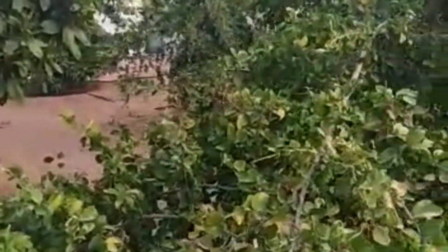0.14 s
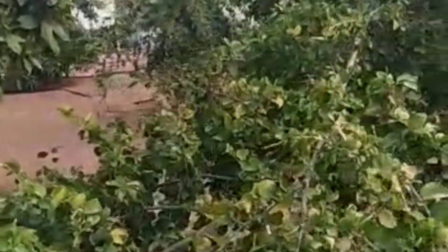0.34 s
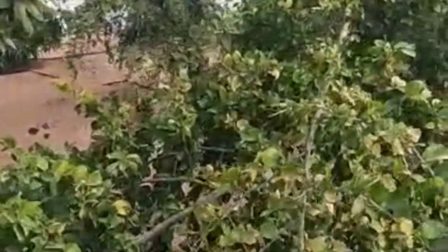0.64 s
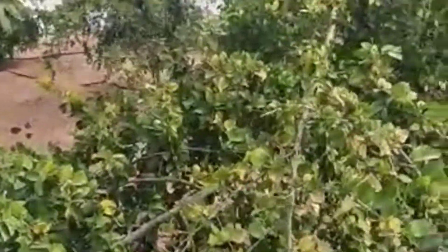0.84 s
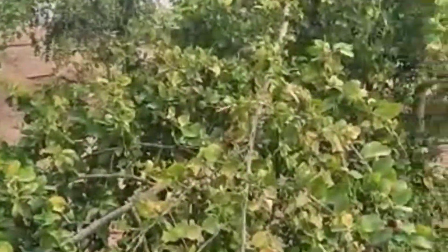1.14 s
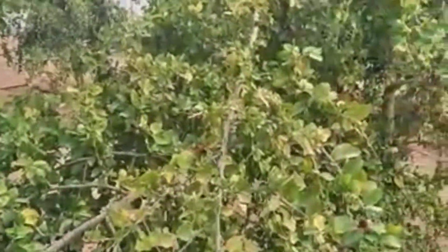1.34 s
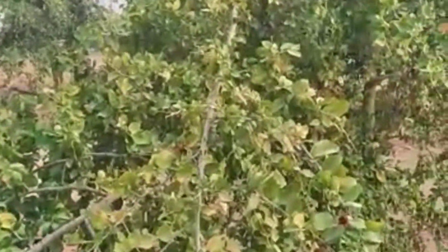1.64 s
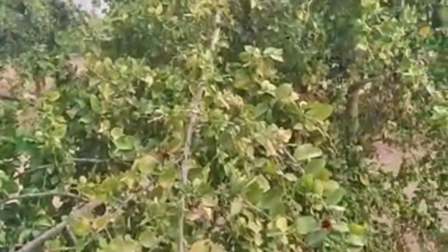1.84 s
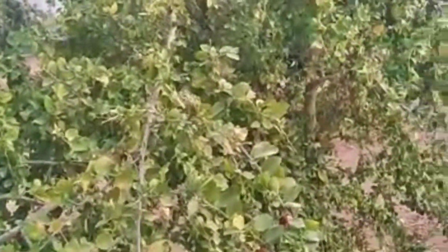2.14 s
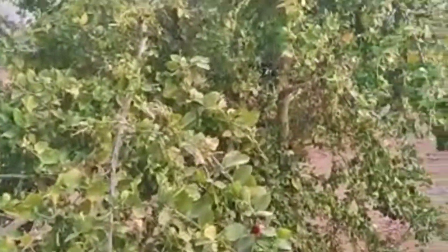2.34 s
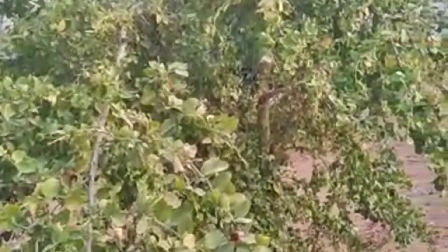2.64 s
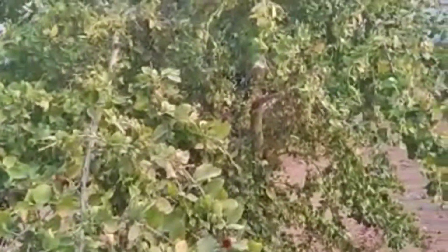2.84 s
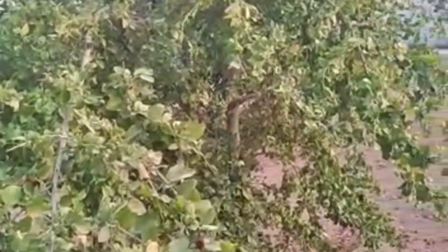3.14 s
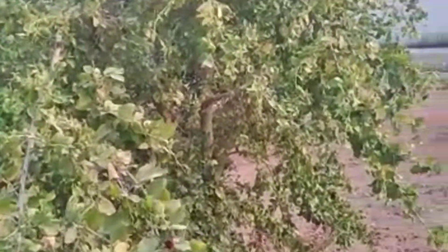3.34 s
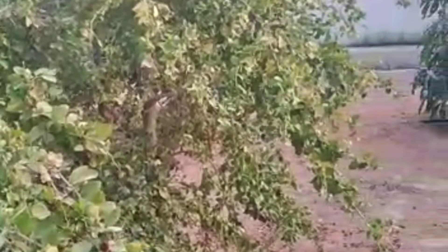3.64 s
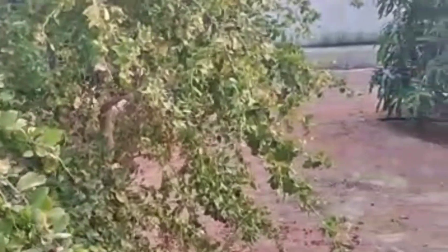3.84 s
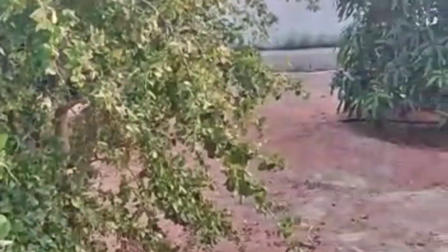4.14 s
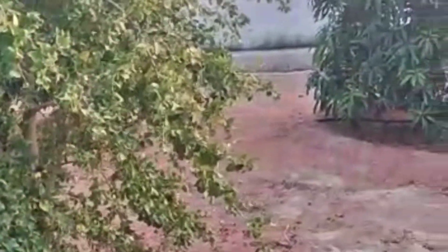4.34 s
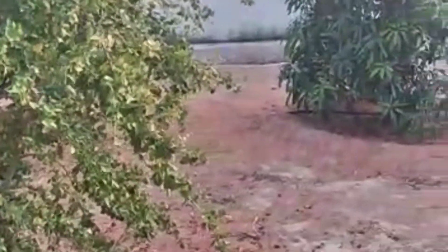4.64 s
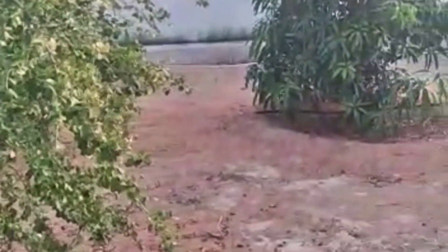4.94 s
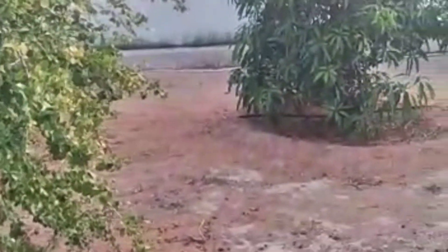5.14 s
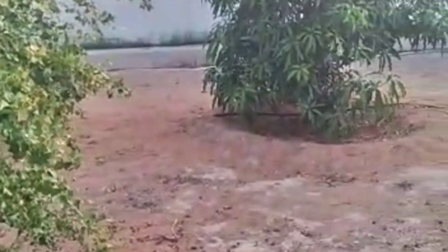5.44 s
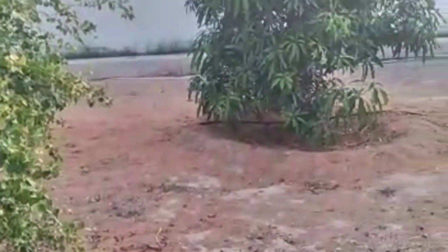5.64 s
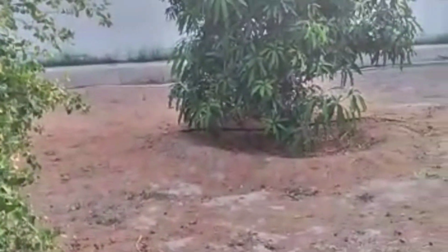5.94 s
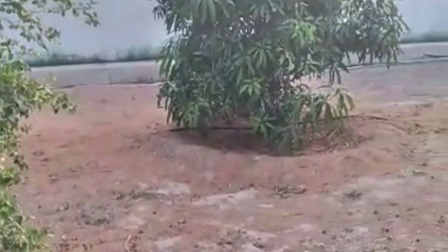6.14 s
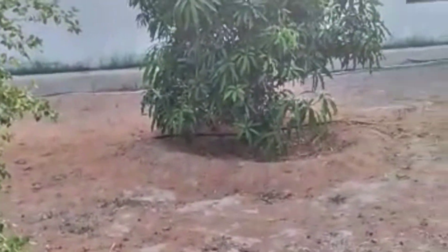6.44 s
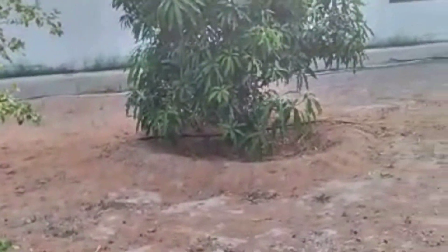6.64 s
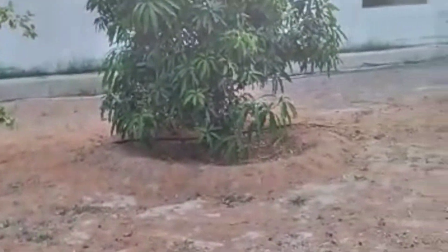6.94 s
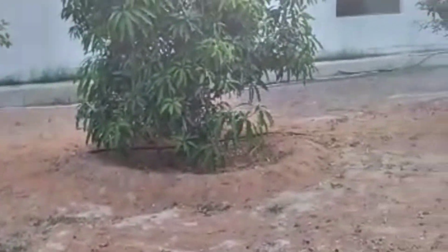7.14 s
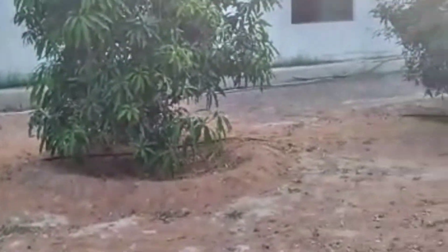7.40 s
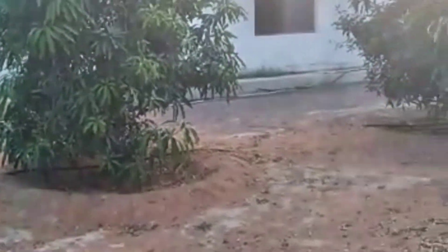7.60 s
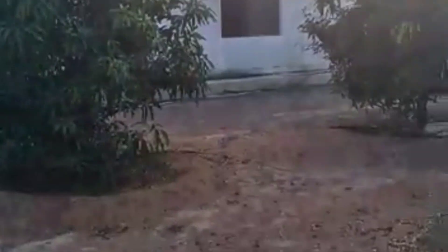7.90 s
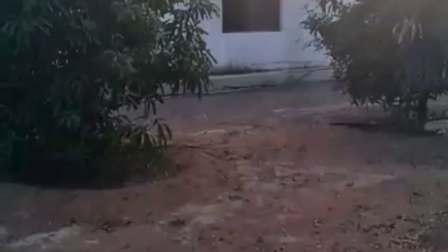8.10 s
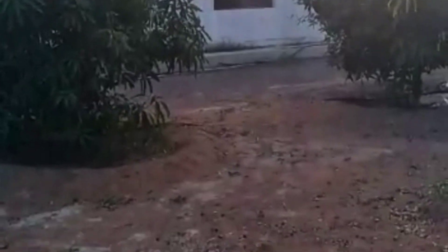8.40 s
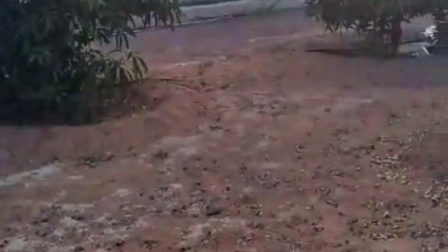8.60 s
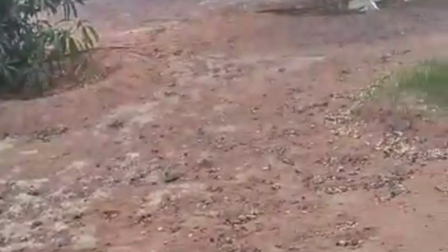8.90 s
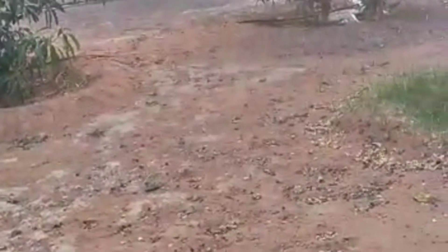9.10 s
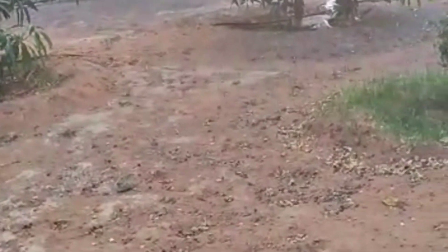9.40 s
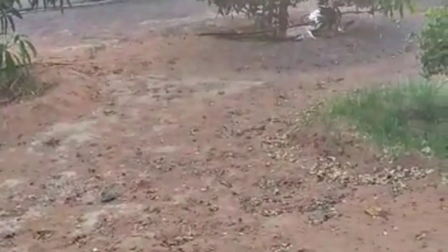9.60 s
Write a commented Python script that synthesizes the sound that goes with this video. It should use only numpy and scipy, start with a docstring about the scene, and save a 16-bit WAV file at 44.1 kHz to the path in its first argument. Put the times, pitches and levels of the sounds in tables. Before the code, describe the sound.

Outdoor stereo ambience among trees and walls: a nearby house sparrow chirps steadily, some calls clear and warbling, others rattling and softer. Distant sparrows fill the gaps with weak, echoing replies. Soft road rumble, an unsteady low hum and faint far whines continue throughout. After eight seconds, a few tiny handling-like clicks and a sharp ringing knock occur close to the microphone's left side.

```python
"""Sparrows in a walled yard

A sparrow chirps again and again close by; others answer from farther off, blurred by echo.
Each chirp is a gliding sine with a rough rasp at its start; the close bird adds overtones and fizz.
Shaped noise makes distant traffic and tree hiss, wandering sines a motor's hum and far whines.
Thin far whistles and brief leaf rustles pass; late on come small noise ticks and a ringing knock."""
import sys
import numpy as np
from scipy import signal
from scipy.fft import rfft, irfft, next_fast_len
from scipy.io import wavfile
from scipy.ndimage import uniform_filter1d

SR = 44100
rng = np.random.default_rng(int(sys.argv[2]) if len(sys.argv) > 2 else 0)


def master(y):
    """Save y as 16-bit WAV."""
    cut = np.clip(np.atleast_2d(y).T, -1, 1)
    pcm = np.round(cut * 32767)  # scale
    wavfile.write(sys.argv[1], SR, pcm.astype(np.int16))


N = 430406
TIME = np.arange(N) / SR
RASP_LEAD_S = 0.031  # the rasp starts this long before the chirp's whistle


def from_db(db):
    """Decibels to gain."""
    return 10 ** (np.asarray(db) / 20)


def rms_one(x):
    """Scale to unit rms."""
    return x / np.sqrt(np.mean(x ** 2) + 1e-20)


def at_hz(points, hz):
    """Read a curve of (Hz, value) points on a log-frequency axis."""
    point_hz, values = np.transpose(points)
    return np.interp(np.log(hz + 1e-3), np.log(point_hz), values)


def pan(db):
    """Left and right gains for a left-over-right level difference, at constant power."""
    gains = from_db(np.array([[db], [-db]]) / 2)
    return gains / np.sqrt(np.mean(gains ** 2))


def from_left(x, lag_ms):
    """A sound from the left reaches the right microphone a little later."""
    return np.array([x, np.interp(TIME - lag_ms / 1000, TIME, x)])


def drift(rate, size=N):
    """Random wander about zero: straight lines between normal draws, `rate` draws a second."""
    steps = np.arange(size) * rate / SR
    count = int(steps[-1]) + 2
    return np.interp(steps, np.arange(count), rng.standard_normal(count))


def add(track, s, sound):
    """Mix a sound into a track at a time in seconds."""
    start = round(s * SR)
    part = track[..., start:start + sound.shape[-1]]
    part += sound[..., :part.shape[-1]]


def noise(spectrum):
    """Stereo noise of rms 1, alike in the bass and diffuse in the treble."""
    # Likeness between the ears. Each row: frequency in Hz, coherence from 0 to 1.
    likeness = [(250, 0.97), (500, 0.81), (1000, 0.49), (8000, 0.08)]
    size = next_fast_len(N, True)
    hz = np.fft.rfftfreq(size, 1 / SR)
    mid, side = rfft(rng.standard_normal((2, size)))
    alike = np.clip(at_hz(likeness, hz), 0, 1)
    lowest_hz, highest_hz = spectrum[0][0], spectrum[-1][0]
    gain = from_db(at_hz(spectrum, hz))
    # roll off well outside the drawn spectrum
    gain = gain / (1 + (hz / (2 * highest_hz)) ** 4) / (1 + (lowest_hz / (2 * hz + 1)) ** 4)
    ears = np.sqrt(1 + alike) * mid + np.sqrt(1 - alike) * side * [[1], [-1]]
    return rms_one(irfft(gain * ears)[:, :N])


def uneven(x, patchy_db):
    """The treble flickers in narrow patches, about a tenth of a second long."""
    hz, _, cells = signal.stft(x, SR, nperseg=1024)
    patches = rng.standard_normal(cells.shape[1:])
    patches = uniform_filter1d(uniform_filter1d(patches, size=7, axis=0), size=10, axis=1)
    depth_db = patchy_db * np.clip(hz[:, None] / 2200, 0, 1) ** 4  # full depth above 2200 Hz
    gain = from_db(depth_db * np.clip(rms_one(patches), -2.5, 1.5))
    gain = gain / np.sqrt(np.mean(gain ** 2, axis=1, keepdims=True))
    return signal.istft(cells * gain, SR, nperseg=1024)[1][:, :N]


def yard(x, wet_db, early_db, early_s, t60=0.7):
    """Quick scatter off nearby walls and leaves, then the yard's longer tail (t60 in s)."""
    t = TIME[:SR]
    sparse = rng.standard_normal((2, SR)) * (rng.random((2, SR)) < .05)
    scatter = sparse * np.exp(-t / early_s) * (t > .001)
    tail = rng.standard_normal((2, SR)) * from_db(-60 * t / t60) * (1 - np.exp(-t / 0.013))
    # at 0 dB, scatter or tail carries as much energy as the direct sound
    response = (from_db(early_db) * rms_one(scatter) + from_db(wet_db) * rms_one(tail)) / np.sqrt(SR)
    return x + signal.fftconvolve(x * np.ones((2, 1)), response, axes=1)[:, :N]


def background(hum_wander=0.00437, swell_db=2.0, air_db=-69.5):
    """Far traffic, a slightly unsteady motor and the faint hiss of the trees."""
    # Traffic over time. Each row: time in seconds, rumble in dB, tyre noise in dB.
    traffic = [(0.0, -46, -55.5), (1.249, -44, -55.5), (5.98, -45, -56), (6.79, -44.5, -58.5),
               (7.4, -45, -55), (9.16, -44.5, -60.5), (9.76, -44.5, -54)]
    # The motor's hum. Each row: mean pitch in Hz, mean level in dB rms.
    hum_tones = [(61, -51), (87.3, -56.5), (101, -59), (122, -54.5), (244, -54)]
    # Noise colours. Each row: frequency in Hz, relative density in dB per Hz.
    rumble_colour = [(25, -22), (45, -21.5), (75, -2), (120, 1), (190, -1), (300, -1), (420, -11),
                     (700, -22)]
    tyre_colour = [(250, -40), (450, 0.5), (740, 4), (950, -11), (1200, -5), (1500, -3.5), (1850, -19.5),
                   (2300, -16.5), (4000, -30.5)]
    swish_colour = [(700, -25), (1350, 6.5), (2000, -13.5)]
    air_colour = [(1500, -30), (2600, -10.5), (4000, -7), (5800, -21), (13500, -31)]

    s, rumble_db, tyres_db = np.transpose(traffic)
    road = from_db(np.interp(TIME, s, rumble_db)) * noise(rumble_colour)
    road += from_db(np.interp(TIME, s, tyres_db) + swell_db * drift(16)) * noise(tyre_colour)
    # one far swell of tyre noise
    swell = np.exp(-np.minimum(((TIME - 2.3) / 0.33) ** 2, 50))
    road += from_db(-59.0) * swell * noise(swish_colour)
    hum = np.zeros(N)
    for hz, db in hum_tones:
        phase = 2 * np.pi * np.cumsum(hz * (1 + hum_wander * drift(8))) / SR
        hum += from_db(db + .8 * drift(5)) * np.sqrt(2) * np.sin(phase)
    air = from_db(air_db) * noise(air_colour)
    # the swapped ears put the hum on the right
    return uneven(road + air, patchy_db=10.5) + from_left(hum, lag_ms=0.19)[::-1]


def chirp(name, flutter_db, flutter_rate, jitter=0.0067, edge_s=0.00055):
    """One gesture of the syrinx, a rounded glide that may shake into a trill: (phase, envelope)."""
    # The repertoire by kind of chirp. Each row: time in seconds, pitch in Hz before the bird's
    # own pitch ratio, level in dB relative to the call.
    repertoire = { "warble": [(0, 3450, -23.5), (.007, 4200, -3), (.015, 5200, -4.5), (.029, 5350, 1),
                  (.034, 4250, -1), (.049, 3950, -5.5), (.056, 3200, -12.5), (.064, 4700, -0.5),
                  (.070, 3450, -3), (.077, 3250, -14), (.089, 4100, -0.5), (.105, 4680, -1.5),
                  (.111, 3600, -3.5), (.124, 2550, -16.5), (.133, 3550, -8.5), (.145, 2500, -17)],
                  "chirrup": [(0, 3700, -8.5), (.009, 4800, -0.5), (.036, 5250, 4), (.043, 3750, 0),
                  (.054, 3250, -20), (.066, 2900, -24), (.075, 3450, -5.5), (.092, 3200, -4),
                  (.114, 4080, 0), (.118, 3200, -3), (.130, 2700, -31)], "cheep": [(0, 3860, -10),
                  (.010, 4780, -7.5), (.026, 4796, 6), (.039, 3510, -4), (.047, 4010, -4.5),
                  (.056, 2950, -14), (.068, 3600, 1), (.083, 4150, 2), (.089, 3340, -0.5),
                  (.112, 2600, -14)], "trill": [(0, 5710, 1), (.005, 3880, -12.5), (.016, 5325, -2),
                  (.034, 5190, -4.5), (.038, 4420, 5), (.045, 4930, -10.5), (.092, 4700, 3.5),
                  (.097, 3400, -11), (.117, 4330, 5), (.125, 3980, -13.5), (.137, 4000, -4)],
                  "slur": [(0, 3650, -14), (.015, 5300, 5.5), (.029, 4200, -5.5), (.039, 4300, 10.5),
                  (.044, 3250, -2), (.062, 4550, 0), (.072, 3850, 4), (.138, 2600, -8.5)],
                  "answer": [(0, 5400, -4), (.008, 5900, -2), (.030, 4700, 3.5), (.042, 3200, -2.5),
                  (.058, 3495, -14), (.100, 3900, 3), (.118, 2800, -3)], "arches": [(0, 3720, -9),
                  (.021, 5380, 4.5), (.040, 4125, 1.5), (.062, 3300, -18), (.086, 3500, -3.5),
                  (.114, 4580, 7.5), (.128, 3330, -20)], "drop": [(0, 3850, -8.5), (.040, 2940, -15),
                  (.085, 2680, -25)], }
    # Stretches of rapid pitch shake by kind of chirp: start in seconds, end in seconds,
    # depth in Hz, rate in Hz; the depth also follows the bird's ratio.
    shakes = {"trill": (0.036, 0.095, 650, 170), "slur": (0.069, 0.14, 310, 100)}
    s, hz, db = np.transpose(repertoire[name])
    t = TIME[:SR // 5]
    start, end, depth_hz, rate_hz = shakes.get(name, (0, 0, 0, 0))
    pitch = uniform_filter1d(np.interp(t, s, hz), size=150)
    shake_phase = 2 * np.pi * rate_hz * (t - start) + drift(rate_hz, size=len(t)) / 2
    pitch += depth_hz * ((t > start) & (t < end)) * np.sin(shake_phase)
    # no two calls are alike: the pitch trembles a little
    pitch *= 1 + jitter * drift(401, size=len(t))
    level_db = np.interp(t, s, db) + flutter_db * drift(flutter_rate, size=len(t))
    edges = np.clip(np.minimum(t, s[-1] - t) / edge_s, 0, 1)
    return 2 * np.pi * np.cumsum(pitch) / SR, np.sqrt(2) * from_db(level_db) * edges


def opening_rasp(hz, rise_hz=1500, roughness_rate=1700, length_s=.052):
    """Each chirp starts with a rasp: a broad, rough high note that swells and lifts."""
    count = int(length_s * SR)
    phase = 2 * np.pi * np.cumsum(hz + rise_hz * np.linspace(-.5, .5, count)) / SR
    rough = drift(roughness_rate, size=count) * np.sin(phase)
    rough += drift(roughness_rate, size=count) * np.cos(phase)
    return np.hanning(count) * rough


def near_sparrow(fizz_db=-34, second_db=-24, third_db=-38, wet_db=-12):
    """A clear whistle; its hoarse overtones and fizz come strongly scattered off the walls."""
    # The close bird's calls. Each row: start in seconds, level in dB, opening rasp in dB relative
    # to the call, rasp pitch in Hz, pitch ratio of the whistle, kind of chirp.
    near_calls = [(0.397, -33, -7, 6340, 0.97, "chirrup"), (1.099, -36.5, -12, 8100, 1.002, "trill"),
                  (1.71, -28, -12.5, 6900, 1.004, "warble"), (2.932, -29, -16.5, 6770, 1, "warble"),
                  (3.528, -37.5, -15, 7940, 0.97, "trill"), (4.194, -33.5, -13.5, 7130, 1, "chirrup"),
                  (5.016, -30.5, -13.5, 6800, 0.97, "warble"), (5.862, -33, -17, 7600, 1.04, "cheep"),
                  (6.602, -31, -16, 6700, 1, "warble"), (7.259, -41.5, -28, 5700, 1.006, "trill"),
                  (7.856, -37.5, -3, 6050, 1.01, "slur"), (8.58, -32, -9.5, 6240, 1.046, "cheep"),
                  (9.231, -29.5, -12.5, 6200, .99, "warble")]
    # Breathy fizz. Each row: frequency in Hz, relative density in dB per Hz.
    fizz_colour = [(4500, 3), (6500, -18), (8500, -47), (10500, -5), (13500, -39)]
    tone, rattle, effort, upper = np.zeros((4, N))
    for s, level_db, rasp_db, rasp_hz, ratio, name in near_calls:
        phase, envelope = chirp(name, flutter_db=0.0, flutter_rate=390)
        phase, envelope = ratio * phase, from_db(level_db) * envelope
        ragged = phase + drift(900, size=len(phase))  # phase jitter makes the overtones hoarse
        rasp = from_db(level_db) * opening_rasp(rasp_hz)
        whistle = envelope * np.sin(phase + .2 * drift(1200, size=len(phase)))
        add(rattle if name == "trill" else tone, s, whistle)
        overtones = from_db(second_db) * np.sin(2 * ragged) + from_db(third_db) * np.sin(3 * ragged)
        add(upper, s, envelope * overtones)
        add(upper, s - RASP_LEAD_S, from_db(rasp_db) * rasp)
        # the fizz follows both whistle and rasp
        add(effort, s, envelope)
        add(effort, s - RASP_LEAD_S, np.abs(rasp))
    fizz = from_db(fizz_db) * effort * noise(fizz_colour)
    # the swapped ears let the whistle reach the right microphone first
    clear = yard(from_left(tone, lag_ms=.26)[::-1], wet_db=wet_db, early_db=-8.5, early_s=.036)
    # the trills carry stronger close reflections, which thicken their rattle
    clear += yard(rattle, wet_db=wet_db + 1, early_db=-4.5, early_s=.024)
    hoarse = yard((upper + fizz) * pan(db=17), wet_db=-11, early_db=0.0, early_s=0.046, t60=0.3)
    return clear * pan(db=2.5) + uneven(hoarse, patchy_db=8.5)


def far_sparrows(variety=0.02, rasp_db=-17, rasp_hz=6700):
    """Broken answers from the trees, each at a pitch of its own, half lost in the yard's echo; the close bird's
    trill at 7.26 s also trails off here in a falling glide."""
    # The distant calls, and at 7.365 s the falling end of the close bird's trill from 7.26 s. Each row: start
    # in seconds, level in dB before echo, kind of chirp.
    far_calls = [(0.778, -62.5, "answer"), (1.926, -51.5, "arches"), (2.6, -66, "cheep"),
                 (2.67, -58.5, "answer"), (3.14, -49, "arches"), (3.85, -63.5, "slur"),
                 (3.926, -62.5, "answer"), (4.6, -58.5, "drop"), (4.667, -56, "cheep"),
                 (4.725, -65, "answer"), (4.938, -48, "arches"), (5.281, -67, "cheep"),
                 (5.513, -56.5, "answer"), (6.318, -57, "answer"), (6.744, -57.5, "chirrup"),
                 (6.975, -56, "answer"), (7.365, -41.5, "drop"), (7.555, -58.5, "cheep"),
                 (8.8, -52, "cheep"), (9.494, -62.5, "answer"), (9.673, -56, "arches")]
    tone = np.zeros(N)
    for s, level_db, name in far_calls:
        phase, envelope = chirp(name, flutter_db=3.5, flutter_rate=120)
        ratio = 1 + variety * rng.uniform(-0.995, 1)
        add(tone, s, from_db(level_db) * envelope * np.sin(phase * ratio))
        add(tone, s - RASP_LEAD_S, from_db(level_db + rasp_db) * opening_rasp(rasp_hz))
    return yard(tone * pan(db=-2.5), wet_db=2.5, early_db=0.5, early_s=0.06, t60=.45)


def soft_note(length, pitch_hz, level_db, waver, waver_rate):
    """A note that swells and fades while its pitch wavers."""
    count = int(length * SR)
    pitch = np.linspace(*pitch_hz, count) * (1 + waver * drift(waver_rate, size=count))
    return from_db(level_db) * np.hanning(count) * np.sin(2 * np.pi * np.cumsum(pitch) / SR)


def whistles():
    """Faint wavering notes far away, mostly echo."""
    # Each row: start in seconds, length in seconds, middle pitch in Hz, rise over the note in Hz,
    # peak level in dB before echo.
    whistle_notes = [(2.077, 0.29, 2530, 151, -67), (7.453, 0.26, 1787, 0, -67),
                     (8.401, 1.07, 1700, 0.5, -68.5), (9.024, 0.084, 2450, 250, -62)]
    tone = np.zeros(N)
    for s, length, hz, rise_hz, level_db in whistle_notes:
        glide_hz = (hz - rise_hz / 2, hz + rise_hz / 2)
        add(tone, s, soft_note(length, glide_hz, level_db, waver=.02, waver_rate=110))
    return yard(tone, wet_db=5.0, early_db=12.0, early_s=0.13)


def far_whine(lower_ratio=.82, lower_db=-3):
    """Distant vehicles whine on two wandering tones, coming and going, blurred by echoes."""
    # Each row: start in seconds, length in seconds, upper pitch in Hz, its peak level in dB before echo.
    whine_notes = [(3.398, 0.75, 789, -64.5), (4.95, 1.76, 759.4, -64), (7.15, 0.9, 756, -67.5),
                   (9.249, 0.62, 773, -64.5)]
    tone = np.zeros(N)
    for s, length, hz, level_db in whine_notes:
        for pitch, db in (hz, level_db), (hz * lower_ratio, level_db + lower_db):
            add(tone, s, soft_note(length, (pitch, pitch), db, waver=0.03, waver_rate=6))
    return yard(tone, wet_db=4, early_db=-1.5, early_s=0.057)


def rustle(rise_s=0.015):
    """Brief stirs of leaves: flickering noise that rises fast and fades."""
    # Each row: start in seconds, level in dB before the rise and fade, fading time constant in seconds.
    stirs = [(4.311, -39, 0.072), (7.36, -41, 0.054)]
    # Leaf noise. Each row: frequency in Hz, relative density in dB per Hz.
    leaf_colour = [(1200, -15.5), (3500, -6.5), (6000, -22.5), (8500, -20.5), (13000, -32)]
    envelope, t = np.zeros(N), TIME[:SR]
    for s, level_db, fade_s in stirs:
        add(envelope, s, from_db(level_db) * (1 - np.exp(-t / rise_s)) * np.exp(-t / fade_s))
    return envelope * from_db(1.06 * drift(140)) * uneven(noise(leaf_colour), patchy_db=15.0)


def ticks(tick_s=0.0036):
    """Dry bursts of bright noise that die within milliseconds."""
    # Each row: start in seconds, level in dB, left-over-right difference in dB.
    tick_hits = [(8.068, -40, 30), (8.202, -42, 20), (8.56, -40, 21), (8.985, -49, 29)]
    # Tick noise. Each row: frequency in Hz, relative density in dB per Hz.
    tick_colour = [(1500, -21), (8000, 2), (11000, 0.5), (14000, -14)]
    envelope = np.zeros((2, N))
    for s, level_db, pan_db in tick_hits:
        burst = from_db(level_db) * np.exp(-TIME[:SR // 10] / tick_s)
        add(envelope, s, burst * pan(pan_db))
    return yard(envelope * noise(tick_colour), wet_db=-6.0, early_db=-3.0, early_s=0.017, t60=0.34)


def knock(split_hz=3500):
    """Hard contacts snap the high modes; the push that follows thuds in the low ones."""
    # Quick successive contacts. Each row: start in seconds, snap in dB, thud in dB.
    contacts = [(8.5612, -13, -31), (8.5624, -35, -28), (8.5633, -43, -14)]
    # Ringing modes. Each row: frequency in Hz, level in dB relative to the blow, t60 in seconds.
    modes = [(774, -1, 0.004), (1590, -1.5, 0.0064), (2390, 3, 0.0079), (5400, 3.5, 0.0011),
             (6500, -3.5, 0.0032), (7670, -13, 0.008), (9260, -2.5, 0.0032)]
    out, t = np.zeros(N), TIME[:SR // 20]
    for s, snap_db, thud_db in contacts:
        for k, (hz, level_db, t60) in enumerate(modes):
            blow_db = snap_db if hz > split_hz else thud_db
            decay = from_db(blow_db + level_db - 60 * t / t60)
            add(out, s, (-1) ** k * decay * np.sin(2 * np.pi * hz * t))
    return yard(from_left(out, lag_ms=0.23) * pan(db=28), wet_db=-15.5, early_db=-17.5, early_s=0.012)


def scene():
    """Everything heard in the yard."""
    birds = near_sparrow() + far_sparrows()
    return background() + birds + whistles() + far_whine() + rustle() + ticks() + knock()


def record(dry, cutoff_hz=14300):
    """The two microphones differ in colour; the top is cut."""
    # The microphones' difference. Each row: frequency in Hz, left-over-right level in dB.
    balance = [(100, 0.3), (400, 1.25), (1300, 4), (2300, -13), (3500, -10), (5000, 1), (13000, 1)]
    size = next_fast_len(N + SR // 10, True)
    difference_db = at_hz(balance, np.fft.rfftfreq(size, 1 / SR))
    tilt = from_db(difference_db * np.array([[1], [-1]]) / 2)
    tilt = tilt / np.sqrt(np.mean(tilt ** 2, axis=0))
    coloured = irfft(rfft(dry, size) * tilt, size)[:, :N]
    return signal.sosfilt(signal.ellip(10, .2, 80, cutoff_hz, fs=SR, output="sos"), coloured)


dry = scene()
out = record(dry)
master(out)
```